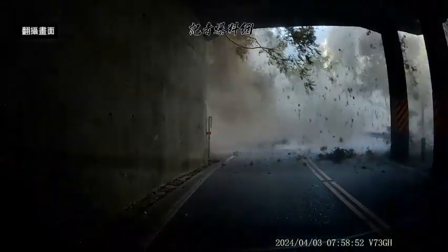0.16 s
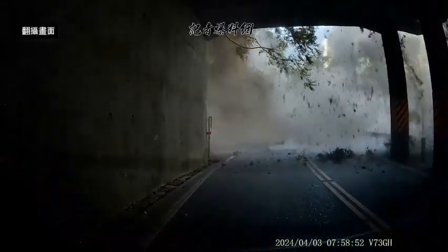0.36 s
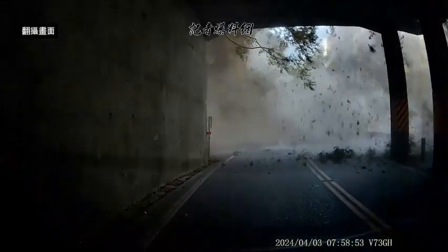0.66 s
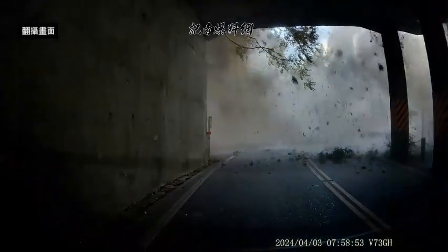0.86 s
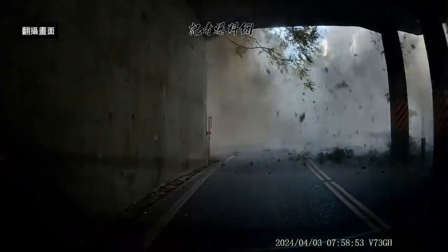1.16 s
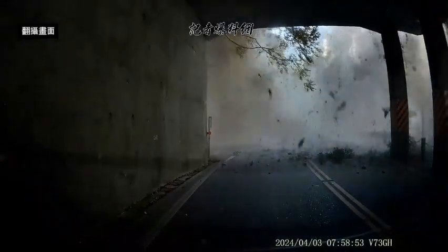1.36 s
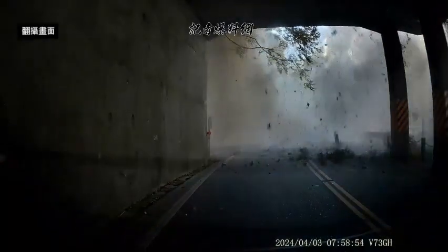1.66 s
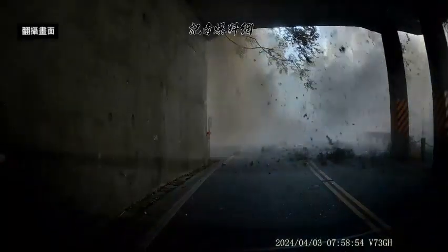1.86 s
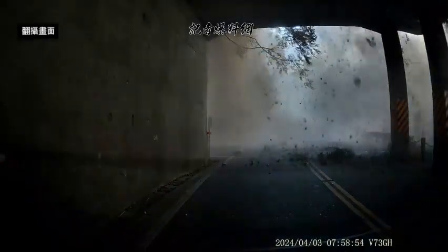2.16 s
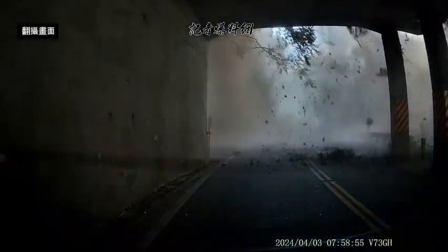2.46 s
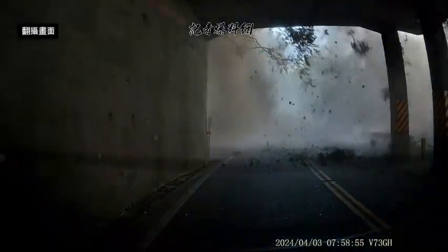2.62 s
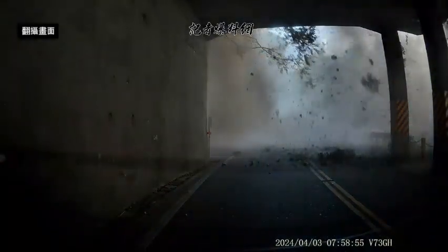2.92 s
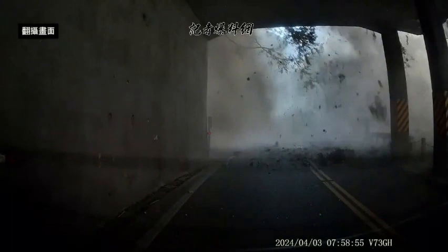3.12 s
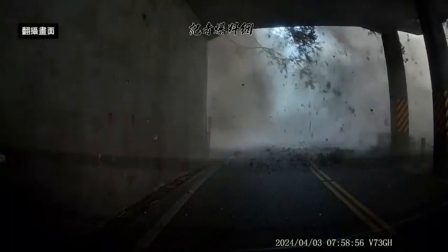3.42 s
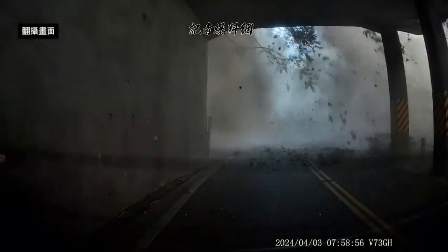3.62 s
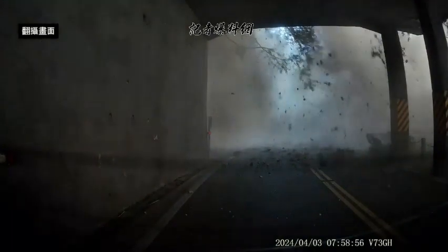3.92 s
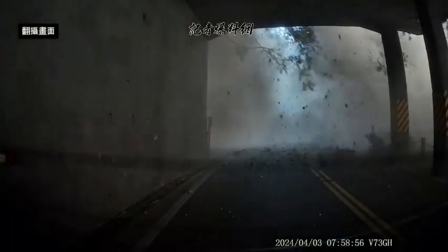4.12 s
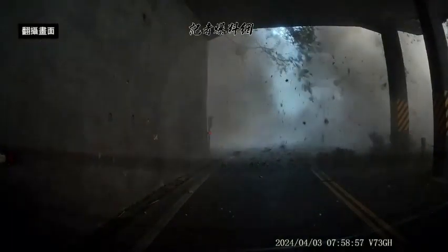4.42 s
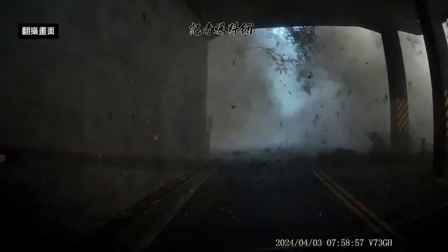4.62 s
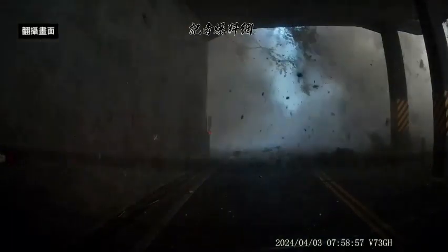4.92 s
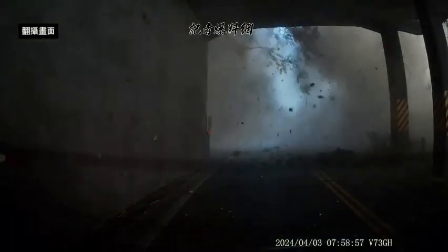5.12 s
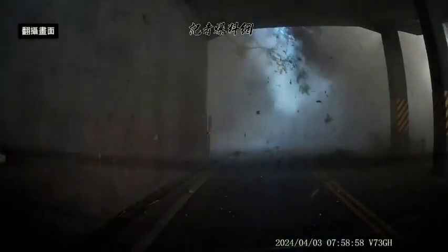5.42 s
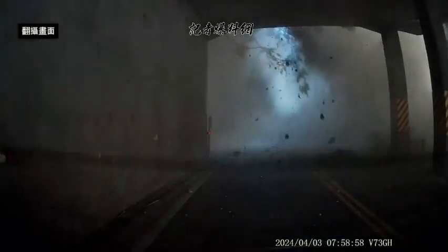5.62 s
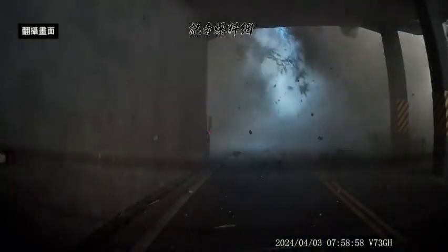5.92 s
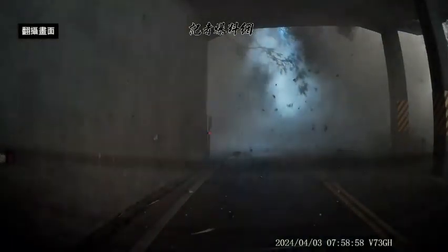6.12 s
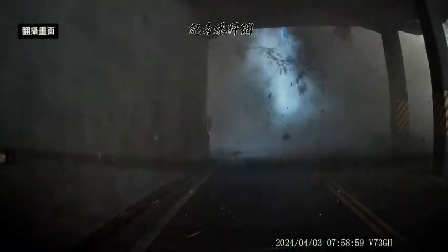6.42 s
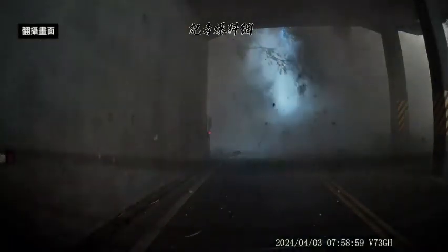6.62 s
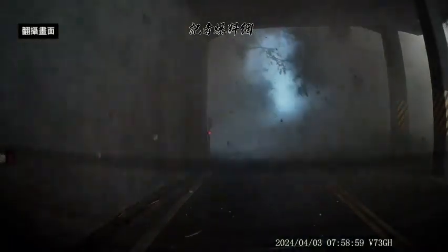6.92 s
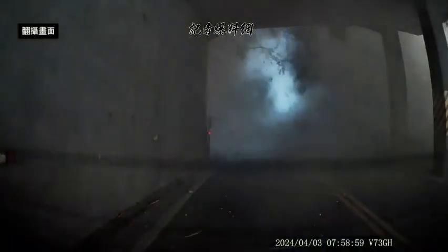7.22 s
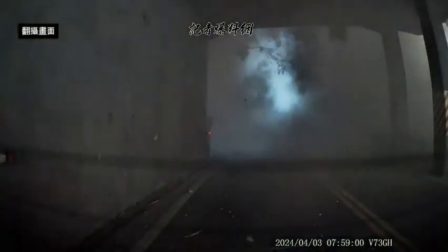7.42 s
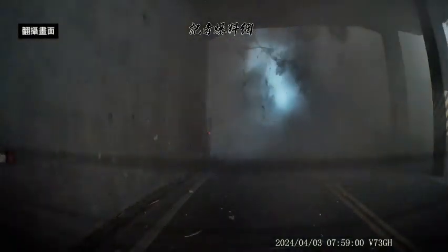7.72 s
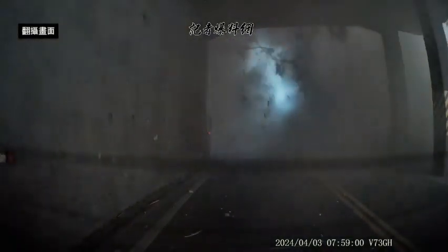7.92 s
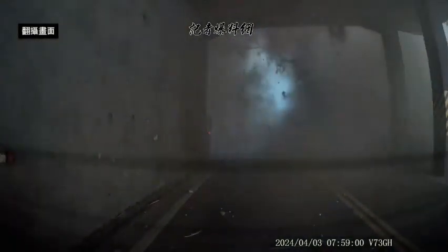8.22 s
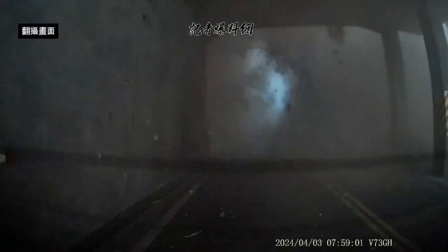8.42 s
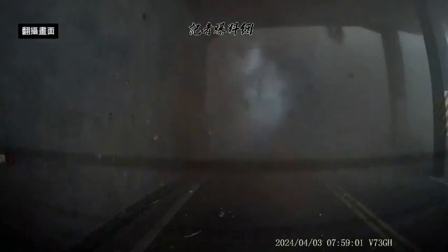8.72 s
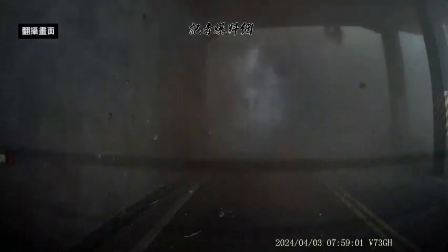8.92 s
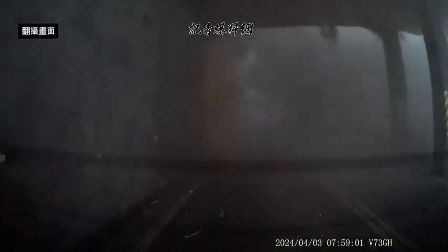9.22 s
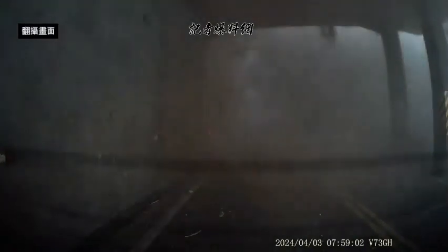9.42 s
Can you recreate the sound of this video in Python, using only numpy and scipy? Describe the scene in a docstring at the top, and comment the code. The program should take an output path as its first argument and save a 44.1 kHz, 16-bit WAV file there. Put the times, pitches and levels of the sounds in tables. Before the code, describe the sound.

Heard inside a stationary car in a concrete gallery, a rockfall is already under way. A dense, rough bed of colliding blocks, rubble and fine grit runs throughout, surging in clumps over ground rumble. At 0.1 s stones bang on the car, with deep boulder thuds and a light spray of grit on the windscreen; rocks shatter at 0.55 and 1.15 s. A very sharp, hard crack strikes at 1.6 s, followed by bursting chips. Boulders boom close together from 2.1 to 2.5 s. Around 3.95 s a stone hits with a big, boomy panel bang, overloading the microphone. Then steadier rattle, tumbling dull knocks and occasional shatters continue, with small sharp hits near 6.9 and 7.15 s. From 8 s knocks and shatters thicken, and very deep booms land at 8.6-8.7 and 9 s. The fall is still going at 9.5 s. Dull, boxy small-microphone sound, short wall echo.

```python
"""In a concrete gallery, inside a waiting car: a rockfall pours onto the road, some of it close by.
Blocks, rubble and grit fall as dense noise of many collisions; boulders land as low wavering booms.
Rocks knock and shatter in noise bursts that the walls echo; sprays of grit patter on the windscreen.
Flying stones bang on the car, a crack and a panel's boom, and overload the small, dull microphone
of the dashboard camera."""
import sys
import numpy as np
from scipy import signal
from scipy.fft import rfft, irfft, next_fast_len
from scipy.io import wavfile
from scipy.ndimage import map_coordinates

SR = 44100
rng = np.random.default_rng(int(sys.argv[2]) if len(sys.argv) > 2 else 0)


def digitize_waveform(pressure):
    """Quantize a signal to 16-bit integers and store it at the path in sys.argv[1].

    Rows of a 2-D input are taken as channels; values are limited to [-1, 1].
    """
    field = np.atleast_2d(pressure).T
    bounded = np.clip(field, -1, 1)
    quanta = np.round(bounded * 32767).astype(np.int16)
    wavfile.write(sys.argv[1], SR, quanta)


N = 421640

# How hard the debris falls, before each layer's own offset: (t/s, level/dB)
GROUND_FLOW = [(0.0, -34.5), (0.13, -21), (1.62, -33.5), (2.21, -25), (2.63, -28), (2.85, -35.5),
               (3.86, -31.5), (5.3, -30), (5.6, -33.5), (7.99, -29.5), (8.17, -22), (8.55, -35),
               (8.78, -22), (9.21, -34), (9.56, -24.5)]
BLOCKS_FLOW = [(0, -22), (.3, -20), (.46, -26), (.6, -19.5), (.82, -27), (1.02, -20), (1.53, -27),
               (1.75, -21), (2.0, -25), (2.3, -23), (2.55, -29), (2.8, -19.5), (2.95, -30.5), (3.4, -25.5),
               (4.3, -27), (4.85, -23.5), (5.2, -25.5), (5.45, -28.5), (6.3, -27.5), (7.5, -28.5),
               (8.0, -26.5), (8.22, -23), (8.9, -28.5), (9.2, -23), (9.56, -26.5)]
RUBBLE_FLOW = [(0, -27), (.57, -23.5), (.7, -25.5), (.9, -19), (1.15, -19), (1.36, -26), (1.78, -32),
               (2.0, -27.5), (2.55, -28), (3.15, -27), (3.43, -24.5), (4.15, -24.5), (4.4, -27.5),
               (4.72, -22.5), (5.2, -25.5), (5.88, -24.5), (6.45, -27), (6.63, -21.5), (6.76, -28.5),
               (7.45, -28), (7.65, -27), (8.0, -27), (8.2, -24), (8.5, -26), (9.56, -29)]
FINE_FLOW = [(0, -38), (.18, -43.5), (.26, -36.5), (.58, -34), (.74, -37.5), (1.15, -31.5), (1.4, -36.5),
             (1.78, -42), (1.9, -37), (2.55, -42), (2.68, -39), (3.36, -37), (3.86, -35.5), (4.3, -38.5),
             (4.95, -35), (5.7, -36), (6.55, -35), (6.74, -39.5), (7.6, -37.5), (8.7, -37.5), (8.95, -40.5),
             (9.56, -40.5)]
# Boulders landing: (t/s, level/dB, f/Hz, t60/s)
BOULDERS = [(0, -2, 40, 0.24), (.005, -5, 135, 0.1), (.18, -2.5, 108.4, 0.21), (.225, -2.5, 173.5, 0.2),
            (0.551, -5, 91.5, 0.14), (.875, -7, 258, 0.22), (0.919, -2, 153.5, 0.3), (0.939, 1, 60.5, 0.19),
            (1.8, -11, 198, 0.25), (2.134, -2.5, 113.6, 0.34), (2.174, 0.5, 171, 0.27),
            (2.241, -0.5, 141, 0.19), (2.279, -6, 132, 0.23), (2.458, 1, 112.5, 0.23),
            (2.718, -10, 50, 0.34), (3.95, -2.5, 99.5, 0.21), (4.39, -4.5, 45, 0.19),
            (4.504, -7, 130, 0.21), (4.565, -1, 47.6, 0.16), (4.818, -2.5, 360, 0.12),
            (5.136, -3.5, 54.3, 0.21), (5.373, -8.5, 123.6, 0.25), (6.921, -5, 59, 0.26),
            (7.61, -5, 38.3, 0.29), (7.828, -6, 159, 0.13), (8.032, -13, 361, 0.2), (8.191, -8.5, 46, 0.13),
            (8.207, -3.5, 161, 0.2), (8.344, -9.5, 333, 0.19), (8.605, 3, 48, 0.21),
            (8.714, 8.5, 34.7, 0.27), (9.002, -1.5, 40.8, 0.26)]
# Stones hitting the car: (t/s, crack level/dB, crack t60/s, crack f/Hz, extra gain at that pitch,
# panel level/dB, panel t60/s)
STRIKES = [(.096, 1, 0.0099, 1700, 3.1, -17, .028), (.102, 0, 0.023, 1970, 1.7, -0.5, 0.2),
           (0.11, -10, .06, 1220, 0.7, -8, 0.073), (1.6235, 9, .064, 3440, .4, 6, .11),
           (1.6857, 2, 0.017, 3190, 0.98, -18, 0.068), (1.703, -18, .11, 1050, 1.5, -4, .18),
           (3.9483, 0, 0.073, 1270, 0.79, 8.5, .15), (3.9662, -6.5, 0.037, 1600, .6, -8, 0.071),
           (3.981, -10.5, 0.086, 1145, 2.9, -13, .12), (4.0442, 1.5, 0.04, 4180, 1.1, -6, .046),
           (4.9534, -9.5, .034, 3090, .8, -14, .042), (6.861, 1.5, 0.021, 4120, 0.45, -45, .03),
           (7.147, -10, 0.073, 2750, 1.6, -39, .04), (7.152, -9, 0.11, 1770, .8, -20, .06),
           (7.163, -11, 0.1, 2400, 0.79, -27, .04)]
# Rock knocking on rock: (t/s, level/dB, f/Hz)
KNOCKS = [(.126, -10.5, 640), (.19, -15, 620), (0.237, -16.5, 1020), (0.539, -14, 1130), (.804, -12.5, 780),
          (0.876, -15, 960), (.945, -14.5, 484), (1.04, -15, 1000), (1.14, -15, 930), (1.19, -17.5, 1100),
          (1.3, -15.5, 750), (1.435, -14.5, 890), (1.545, -16, 1020), (1.817, -14.5, 770),
          (1.848, -16, 884), (2.055, -14, 650), (2.181, -14.5, 735), (2.315, -20.5, 690),
          (2.59, -12.5, 646), (2.735, -16, 450), (2.774, -13.5, 500), (3.236, -17, 900), (3.39, -9, 990),
          (3.576, -11.5, 930), (3.61, -13, 370), (3.775, -12.5, 960), (3.87, -16, 1000), (4.045, -14, 690),
          (4.51, -20, 644), (4.586, -17.5, 660), (4.7, -14, 980), (4.98, -11.5, 800), (5.29, -18, 1110),
          (5.5, -18, 1050), (5.59, -14.5, 390), (5.812, -11, 900), (6.015, -16, 930), (6.135, -17, 340),
          (6.151, -15, 1040), (6.255, -16.5, 800), (6.52, -16, 750), (6.61, -16, 895), (6.94, -15.5, 690),
          (7.365, -13, 483), (7.525, -16.5, 800), (7.685, -15, 760), (7.735, -15, 360), (7.885, -16.5, 900),
          (8.045, -13, 653), (8.124, -12.5, 430), (8.165, -9, 560), (8.222, -12, 1040), (8.37, -14.5, 477),
          (8.52, -24, 740), (8.66, -14, 800), (9.07, -14, 380), (9.175, -18, 1100), (9.27, -19, 1100)]
# Sprays of grit on the windscreen: (t/s, length/s, level/dB)
SPRAYS = [(0.205, 0.049, -33), (0.246, 0.16, -34), (2.633, 0.3, -37), (4.673, 0.08, -33),
          (6.381, 0.022, -29), (7.025, 0.027, -34)]
# Stones bursting on the road close by: (t/s, chips level/dB, sharp edge level/dB)
SHATTERS = [(0.226, -28.5, -29), (0.539, -19, -25.5), (0.5624, -18.5, -29), (1.1373, -30, -25),
            (1.1592, -23, -17), (1.6874, -17.5, -11), (1.805, -19.5, -38), (3.585, -17, -15.5),
            (4.469, -25, -11), (5.524, -19.5, -14.5), (7.68, -25, -18), (8.046, -33, -18.5),
            (8.224, -18, -13.5), (8.4594, -38, -17.5), (9.3516, -24, -49)]

# Colours of the falling mass, coarse to fine: (f/Hz, relative level/dB)
GROUND = [(12, -27.5), (24, 1.5), (36, -2), (50, 0.5), (70, -6.5), (100, -19.5), (200, -70.5), (600, -120)]
BLOCKS = [(55, -17), (90, -3.5), (125, 0.5), (190, -2), (260, -5), (350, -2), (450, -10.5), (650, -12),
          (1500, -68), (5000, -120)]
RUBBLE = [(200, -16), (420, -1.5), (600, 3), (800, 2), (1000, 0), (1250, -1.5), (1500, -6.5), (1800, -17),
          (2300, -23), (4500, -32), (9000, -91)]
GRIT = [(700, -12.5), (1600, 3), (2250, -4.5), (2850, 1.5), (3300, -2.5), (3800, -1.5), (4200, -2.5),
        (4700, 2.5), (5600, -3), (6400, 0), (7300, -8), (8000, -32.5), (9500, -68.5)]
# Colours of stone on the car: the crack, the hardest contacts, the panel: (f/Hz, relative level/dB)
CRACK = [(150, -29), (700, 6.5), (1400, 11), (2150, 0.5), (2700, 8.5), (3450, 1.5), (4150, 4.5), (4500, 6),
         (5000, -18.5), (5600, -21.5), (7500, -17), (9000, -18.5), (16000, -33)]
SNAP = [(3000, -50), (4500, -3), (9000, 4), (15000, 6)]
PANEL = [(30, -28), (85, -5.5), (170, -7.5), (320, -0.5), (480, -4.5), (700, -5.5), (1200, -15.5),
         (1800, -28.5), (4500, -59.5), (9000, -67)]
# Ring of the windscreen under grit: (f/Hz, relative level/dB)
GLASS = [(2000, -29), (2900, -7.5), (3500, -9.5), (4150, -0.5), (4500, -5), (5200, -19.5), (9000, -44)]
# Colours of a shatter's chips and sharp edge, the latter also that of sand: (f/Hz, relative level/dB)
CHIPS = [(300, -13), (1200, 8.5), (2100, -3), (2850, 1.5), (3500, -7), (4200, -5.5), (5000, 3), (7500, -27),
         (9000, -42)]
EDGE = [(3500, -23), (5000, -5), (7400, 0.5), (8300, -30), (9500, -73.5)]

# Air and trim resonances of the car's interior: (f/Hz, width/Hz, boost/dB)
CABIN = [(145.8, 21, 4), (184.6, 7.3, 6), (338, 71, 2.5), (634, 22, 5.5), (665, 20, -4.5), (1192, 27, 2.5),
         (1290, 24, 2), (1650, 72, -3), (2720, 15, -5.5), (3290, 110, -0.5), (4010, 64, 4.5),
         (4173, 100, 4), (5820, 360, 3.5), (6540, 270, -8)]
# Decay of the concrete walls' echo: (f/Hz, t60/s)
GALLERY = [(100, 0.34), (1000, 0.23), (4000, 0.56), (10000, 0.044)]
# Response of the camera's microphone: (f/Hz, gain/dB)
MICROPHONE = [(20, 0), (4330, 0), (4780, -17), (7500, -17), (8500, -21), (15000, -21)]
TOP_HZ = 15600  # nothing passes above this

# Each layer's offset from the flow that drives it
GROUND_DB, BLOCKS_DB, RUBBLE_DB, GRIT_DB, SAND_DB = 3.5, 2, 0.5, 3.5, -4
CLUMPS_PER_S = 13  # knots of the random surge
CRUNCH_DB, CRUNCH_HZ = 3, 263  # depth and top speed of a crack's raggedness
# The panel's drum note, its level against the panel's noise, and the noise's share of its t60
PANEL_HZ, PANEL_RING_DB, PANEL_NOISE_LASTS = 308.3, -8.5, 0.89
KNOCK_RISE_S, KNOCK_T60_S = 0.00079, 0.091  # a knock on the bare road
CUSHION_RISE, CUSHION_T60 = 0.001, 0.0066  # how both lengthen as rubble piles up, s per s
REBOUND_S, REBOUND_DB = 0.013, -6.5  # mean wait before a rock strikes again, change at each contact
SHATTER_T60_S, SHATTER_DOUBLES_DB = 0.12, 18  # t60 for chips at -24 dB, rise that doubles it
EDGE_LASTS = 0.64  # the sharp edge's share of a shatter's t60


def amp(db):
    """Decibels to gain."""
    return 10 ** (np.asarray(db) / 20)


def unit(x):
    """Scale to rms 1."""
    return x / np.sqrt(np.mean(x ** 2) + 1e-20)


def noise(length):
    """White noise."""
    return rng.standard_normal(length)


def along(points, hz):
    """Read (f/Hz, value) points on a log frequency axis."""
    f, v = np.transpose(points)
    return np.interp(np.log(hz + 1), np.log(f + 1), v)


def flow(points):
    """A flow's level in dB at every sample."""
    return np.interp(np.arange(N) / SR, *np.transpose(points))


def wobble(rate):
    """A smooth random curve, rate knots a second."""
    knots = noise(int(N * rate / SR) + 4)
    return map_coordinates(knots, [np.arange(N) * rate / SR])


def filtered(x, response):
    """Apply a response that is a function of frequency."""
    size = next_fast_len(len(x) + 8192)
    spectrum = rfft(x, size) * response(np.fft.rfftfreq(size, 1 / SR))
    return irfft(spectrum, size)[:len(x)]


def cabin(hz):
    """Boost in dB (a dip where negative) from the resonances of the car's interior."""
    return sum(db / (1 + (2 * (hz - centre) / width) ** 2) for centre, width, db in CABIN)


def coloured(x, spectrum):
    """x with a spectrum, heard through the cabin, at rms 1."""
    return unit(filtered(x, lambda hz: amp(along(spectrum, hz) + cabin(hz))))


def add(track, s, sound):
    """Mix a sound into the track at time s."""
    start = max(round(s * SR), 0)
    track[start:start + len(sound)] += sound[:N - start]


def fading(t, t60, rise):
    """A blow's envelope: quick rise, exponential decay."""
    decay = np.exp(-np.log(1000) * t / max(t60, .004))
    return decay * (1 - np.exp(-t / rise))


def hail(rate, spread_db, t60, echo_db):
    """Countless collisions of random size, each a short crunch trailed by the gallery's diffuse echo."""
    t = np.arange(SR // 3) / SR
    hits = rng.random(N + len(t) - 1) < rate / SR  # already falling when the scene opens
    sizes = amp(spread_db * np.clip(noise(len(hits)), -2, 2))
    crunch = fading(t, t60, rise=0.00024)
    echo = amp(echo_db) * fading(t, 0.59, rise=0.008)
    power = signal.fftconvolve(hits * sizes ** 2, (crunch + echo) ** 2, mode="valid")
    return unit(np.sqrt(np.abs(power)) * noise(N))


def slide():
    """The falling mass shakes the ground; its pieces collide in layers, grit and sand falling together."""
    surge = wobble(CLUMPS_PER_S)  # debris arrives in clumps
    ground = coloured(noise(N), GROUND)
    blocks = coloured(hail(rate=130, spread_db=1.0, t60=0.13, echo_db=-14.5), BLOCKS)
    rubble = coloured(hail(rate=200, spread_db=4.5, t60=0.056, echo_db=-3.5), RUBBLE)
    grit = coloured(hail(rate=910, spread_db=2.5, t60=0.062, echo_db=-18.5), GRIT)
    sand = coloured(hail(rate=290, spread_db=7.5, t60=0.059, echo_db=-13.0), EDGE)
    return (amp(flow(GROUND_FLOW) + GROUND_DB) * ground
            + amp(flow(BLOCKS_FLOW) + BLOCKS_DB + 1.0 * surge) * blocks
            + amp(flow(RUBBLE_FLOW) + RUBBLE_DB + .8 * surge) * rubble
            + amp(flow(FINE_FLOW) + GRIT_DB + 1.2 * surge) * grit
            + amp(flow(FINE_FLOW) + SAND_DB) * sand)


def boom(t, pitch_hz, waver):
    """A low note whose phase wavers at random, waver radians rms."""
    shake = unit(filtered(noise(len(t)), lambda hz: 1 / (1 + (hz / (.25 * pitch_hz)) ** 4)))
    return np.sin(2 * np.pi * pitch_hz * t + waver * shake)


def boulders():
    """Each boulder gives a wavering boom, lower for a heavier one, and crushes the rubble under it."""
    out, t = np.zeros(N), np.arange(SR // 2) / SR
    for s, db, pitch_hz, t60 in BOULDERS:
        crush = amp(-12.5) * coloured(noise(len(t)), BLOCKS) * min(pitch_hz / 150, 1)
        landing = boom(t, pitch_hz, waver=1.0) + crush
        add(out, s, amp(db) * landing * fading(t, t60, rise=.9 / pitch_hz))
    return out


def crumbling(t):
    """The ragged gain of a stone that breaks up on contact, at rms 1."""
    jolts = unit(filtered(noise(len(t)), lambda hz: hz < CRUNCH_HZ))
    return unit(amp(CRUNCH_DB * np.tanh(jolts)))


def contact(t, pitch_hz, ring):
    """Stone meeting the car: noise peaked at the pitch, rolled off above it and thin in the bass."""
    def response(hz):
        resonance = 1 + ring / (1 + ((hz - pitch_hz) / (.18 * pitch_hz)) ** 2)
        thin = hz / np.hypot(hz, .22 * pitch_hz)  # a small hard stone has little bass
        return resonance * thin / np.sqrt(1 + (hz / (1.6 * pitch_hz)) ** 4)
    return filtered(noise(len(t)), response)


def panel(t, t60):
    """The damped panel's dull boom, which settles on its drum note."""
    thud = coloured(noise(len(t)), PANEL) * fading(t, PANEL_NOISE_LASTS * t60, rise=0.0069)
    drum = unit(boom(t, PANEL_HZ, waver=1.0)) * fading(t, t60, rise=0.0084)
    return thud + amp(PANEL_RING_DB) * drum


def strikes():
    """A stone on the car: a crack, higher for a harder contact, then the duller boom of the panel."""
    out, t = np.zeros(N), np.arange(SR // 3) / SR
    for s, crack_db, crack_t60, pitch_hz, ring, panel_db, panel_t60 in STRIKES:
        crack = coloured(contact(t, pitch_hz, ring), CRACK)
        crack = amp(crack_db) * crack * fading(t, crack_t60, rise=0.00058) * crumbling(t)
        hardness = min(pitch_hz / 3800, 1) ** 8  # only the hardest contacts snap at the very top
        snap = coloured(noise(len(t)), SNAP) * fading(t, 0.014, rise=0.00022)
        snap = amp(crack_db - 9) * hardness * snap
        add(out, s, crack + snap + amp(panel_db) * panel(t, panel_t60))
    return out


def tumbling(t, t60, rise, count):
    """The envelope of a rock that strikes count times in quick, uneven succession."""
    waits = REBOUND_S * rng.uniform(.4, 1.6, count)
    lags = np.cumsum(waits) - waits[0]
    power = np.zeros(len(t))
    for k, lag in enumerate(lags):
        power += (amp(REBOUND_DB * k) * fading(np.maximum(t - lag, 0), t60, rise)) ** 2
    return np.sqrt(power)


def gallery(x, wet_db):
    """Add the echo of the concrete walls: a noise tail whose highest treble dies first."""
    hz, t, z = signal.stft(noise(SR // 2), SR, nperseg=256)
    decay = np.exp(-np.log(1000) * t / along(GALLERY, hz)[:, None])
    tail = signal.istft(z * decay, SR)[1]
    return x + amp(wet_db) * signal.fftconvolve(x, tail / np.linalg.norm(tail))[:N]


def knocks():
    """Stone hardly rings: dull, tumbling bursts around a pitch, the later ones cushioned by rubble."""
    out, t = np.zeros(N), np.arange(SR // 4) / SR
    for s, db, pitch_hz in KNOCKS:
        def response(hz):
            return amp(cabin(hz)) / (1 + np.abs((hz - pitch_hz) / (.46 * pitch_hz)) ** 3)
        body = unit(filtered(noise(len(t)), response))
        rise = KNOCK_RISE_S + CUSHION_RISE * s
        t60 = KNOCK_T60_S + CUSHION_T60 * s
        add(out, s, amp(db) * body * tumbling(t, t60, rise, count=4))
    return gallery(out, wet_db=-9.0)


def patter():
    """Grit blown onto the windscreen: sprays of tiny ticks that ring the glass."""
    t, swell = np.arange(N) / SR, np.zeros(N)
    for s, length, db in SPRAYS:
        progress = np.clip((t - s) / length, 0, 1)
        swell += amp(db) * np.sqrt(np.abs(np.sin(np.pi * progress)))
    return swell * coloured(hail(rate=360, spread_db=2.0, t60=.02, echo_db=-29.5), GLASS)


def shatters():
    """Nearer stones burst into chips on the asphalt, longer when louder; the sharp edge dies first."""
    out, t = np.zeros(N), np.arange(SR // 3) / SR
    for s, db, edge_db in SHATTERS:
        t60 = SHATTER_T60_S * 2 ** ((db + 24) / SHATTER_DOUBLES_DB)
        chips = coloured(noise(len(t)), CHIPS) * fading(t, t60, rise=0.00029)
        edge = coloured(noise(len(t)), EDGE) * fading(t, EDGE_LASTS * t60, rise=0.00033)
        add(out, s, amp(db) * chips + amp(edge_db) * edge)
    return gallery(out, wet_db=-12.5)


def overload(x, ceiling):
    """Flatten whatever exceeds the ceiling."""
    knee = 14  # higher is more abrupt
    return x / (1 + np.abs(x / ceiling) ** knee) ** (1 / knee)


def scene():
    """Everything as it reaches the microphone on the dashboard."""
    return (slide() + boulders() + strikes() + knocks() + patter() + shatters())[None]


def record(dry):
    """The camera clips the hardest blows at its microphone and at full scale, and passes little treble."""
    clipped = overload(dry[0], .84)
    heard = filtered(clipped, lambda hz: amp(along(MICROPHONE, hz)))
    return filtered(overload(heard, 1), lambda hz: hz < TOP_HZ)[None]


dry = scene()
out = record(dry)
digitize_waveform(out)
```